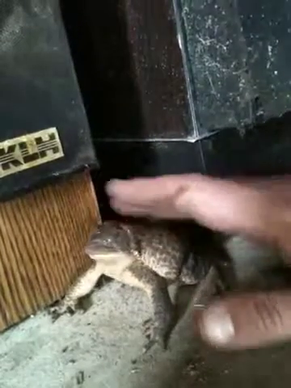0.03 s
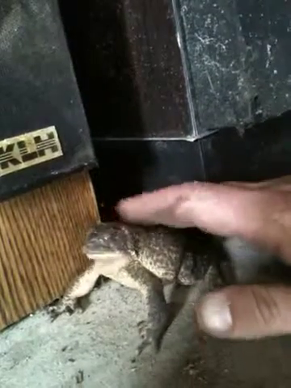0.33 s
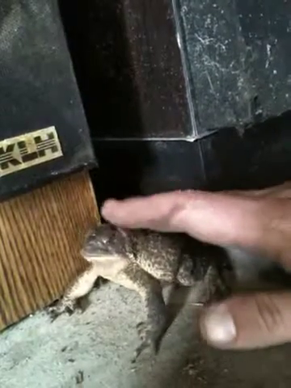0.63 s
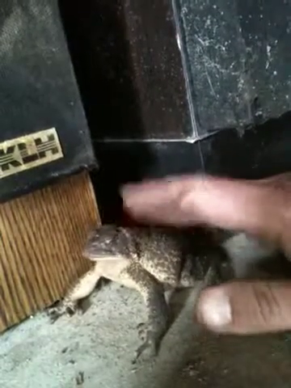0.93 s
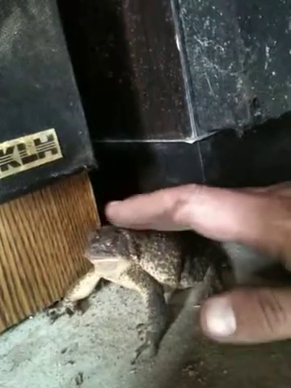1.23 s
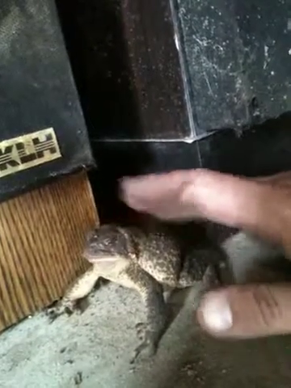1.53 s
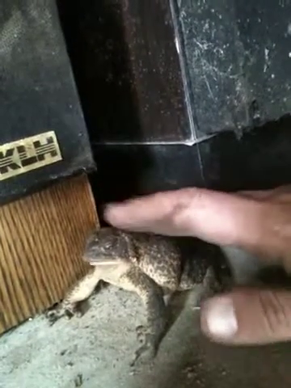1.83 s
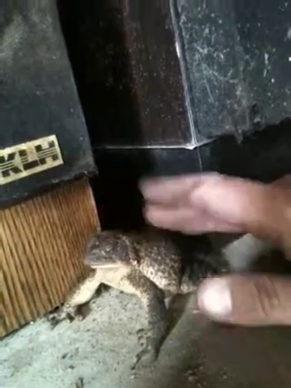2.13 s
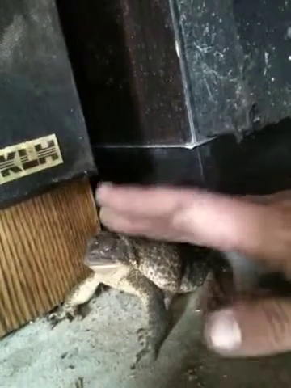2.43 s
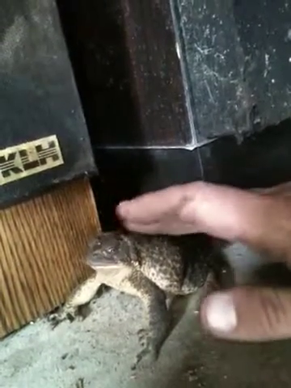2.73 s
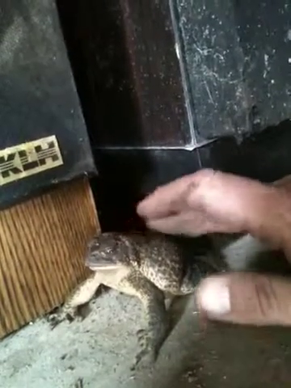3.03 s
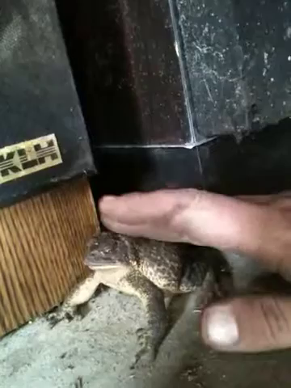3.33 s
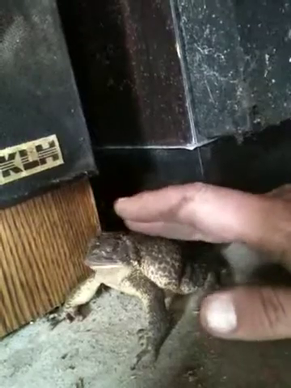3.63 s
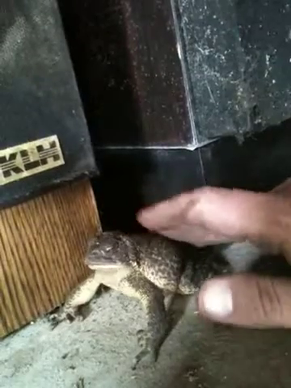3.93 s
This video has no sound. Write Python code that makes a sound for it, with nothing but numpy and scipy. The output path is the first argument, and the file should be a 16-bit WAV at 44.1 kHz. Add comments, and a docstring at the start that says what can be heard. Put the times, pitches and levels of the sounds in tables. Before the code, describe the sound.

A toad close by gives about ten tiny, squeaky chirps in the first second, with soft hand rubs and a faint click near 0.6 seconds. It falls quiet, and two fainter rubs pass by 1.5 seconds. Distant birds whistle, barely audible, from 2.5 to 3.3 seconds. Around 3.7 seconds another rub draws a short run of chirps. An appliance hums low and steady in the room throughout.

```python
"""A toad on an indoor floor answers a stroking hand with tiny release chirps, over an appliance's steady hum.
Each chirp is one squeeze of air: a clear tone that arches and drops, with a thin sheen of high
overtones, thrown back by nearby surfaces. Soft rubs and one faint click fall among the first chirps.
The toad goes quiet, two more rubs pass, and distant birds whistle in the lull.
Near the end, one last rub draws a short run of chirps."""
import sys
import numpy as np
from scipy import signal
from scipy.fft import rfft, irfft
from scipy.io import wavfile

SR = 44100
rng = np.random.default_rng(int(sys.argv[2]) if len(sys.argv) > 2 else 0)


def store_pcm(level_fs):
    """Save levels as 16-bit WAV."""
    pcm = np.round(np.clip(level_fs, -1, 1) * 32767).astype(np.int16)
    wavfile.write(sys.argv[1], SR, np.atleast_2d(pcm).T)


N = 176400
TIME = np.arange(N) / SR


def from_db(db):
    """Decibels to gain."""
    return 10 ** (np.asarray(db) / 20)


def gain_at(curve, hz):
    """Read the gain off an EQ curve of (Hz, dB) points on a log-frequency axis."""
    known_hz, db = np.transpose(curve)
    return from_db(np.interp(np.log(hz + 1e-9), np.log(known_hz), db))


def noise(colour):
    """Noise at unit rms, shaped by a function from frequency to gain."""
    hz = np.arange(N // 2 + 1) * SR / N
    shaped = irfft(rfft(rng.standard_normal(N)) * colour(hz), N)
    return shaped / np.sqrt(np.mean(shaped ** 2) + 1e-20)


def drift(rate_hz):
    """Random modulation at unit rms, moving mostly below the given rate."""
    return noise(lambda hz: 1 / (1 + (hz / rate_hz) ** 2))


def appliance():
    """The bed: broad air noise, narrow droning resonances and a thin, wavering motor whine."""
    # Colour of the room's air noise. Each row: frequency in Hz, relative level in dB.
    air_colour = [(20, -25), (60, -12), (95, -9.5), (120, 1), (205, 1.5), (270, -2), (380, -3), (490, 0),
                  (650, -4.5), (1030, -5), (1350, 1), (1900, -5), (2200, -8.5), (3200, -11), (4500, -17.5),
                  (6000, -20), (8200, -16), (10000, -21.5), (14500, -26.5), (16000, -33)]
    # Humming resonances. Each row: centre in Hz, width in Hz, level in dB.
    drones = [(117.3, 12, -77), (140, 8.6, -71), (202.5, 22, -71), (235.2, 2.6, -73), (309, 40, -77),
              (484, 22, -78), (802, 77, -66.5), (838, 9.6, -71.5), (15300, 210, -92)]
    # Partials of the motor whine. Each row: frequency in Hz, level in dB.
    whine = [(433, -78.5), (1824.6, -67.5), (1884, -76), (1943, -75), (14971, -88), (15030, -82)]
    air_db, waver_db, wander_hz = -59, 1.8, 1.16
    out = from_db(air_db) * noise(lambda hz: gain_at(air_colour, hz))
    for centre, width, db in drones:
        out += from_db(db) * noise(lambda hz: 1 / (1 + (2 * (hz - centre) / width) ** 2))
    for hz, db in whine:
        phase = 2 * np.pi * np.cumsum(hz + wander_hz * drift(rate_hz=2.42)) / SR
        out += np.sqrt(2) * from_db(db + waver_db * drift(rate_hz=8.1)) * np.sin(phase)
    return out


def hiss():
    """Thin bands of high hiss, each swelling and fading on its own."""
    centres_hz, width_hz = (6040, 7600, 8180), 170
    level_db, swell_db = -86.5, 5.5
    bands = [noise(lambda hz: np.exp(-((hz - centre) / width_hz) ** 2)) for centre in centres_hz]
    return sum(band * from_db(level_db + swell_db * drift(rate_hz=7)) for band in bands)


def birds():
    """Distant birds outside: gliding, warbling whistles barely above the hum."""
    # Each row: start in seconds, length in seconds, first and last pitch in Hz, level in dB.
    whistles = [(2.475, 0.046, 2700, 2600, -64.5), (2.73, .11, 2520, 2220, -64),
                (2.83, 0.071, 3500, 3450, -67), (2.88, .035, 3580, 3780, -67),
                (3.12, 0.084, 2660, 2400, -61.5), (3.26, 0.054, 2240, 2180, -63)]
    out = np.zeros(N)
    warble = 1 + 0.017 * drift(rate_hz=89)
    for start, length, first, last, db in whistles:
        span = (TIME >= start) & (TIME < start + length)
        along = (TIME[span] - start) / length
        pitch = (first + (last - first) * along) * warble[span]
        out[span] += from_db(db) * np.sin(np.pi * along) * np.sin(2 * np.pi * np.cumsum(pitch) / SR)
    return out


def room_tail(sound):
    """A short, dull reverb from the floor and furniture."""
    t60_s, send_db, cutoff_hz = 0.11, -16, 4700
    t = TIME[:SR // 2]
    tail = rng.standard_normal(len(t)) * np.exp(-np.log(1000) * t / t60_s)
    wet = signal.fftconvolve(sound, from_db(send_db) * tail / np.linalg.norm(tail))[:N]
    return signal.sosfilt(signal.butter(2, cutoff_hz, fs=SR, output="sos"), wet)


def close_reflections(sound):
    """Close surfaces answer within a chirp: as its pitch falls, the tone dips and swells again."""
    delays_s, levels_db = (.00297, .00406), (-13, -12)
    return sound + sum(from_db(db) * np.interp(TIME - delay, TIME, sound, left=0)
                       for delay, db in zip(delays_s, levels_db))


def hand_rubs():
    """The hand brushes skin softly: short swells of bright friction hiss."""
    # Each row: centre in seconds, half-length in seconds, level in dB.
    strokes = [(0.082, 0.041, -59), (0.338, 0.021, -60.5), (0.667, 0.038, -64.5), (1.003, 0.14, -70.5),
               (1.412, 0.06, -67.5), (3.715, 0.018, -66.5)]
    # Colour of the friction. Each row: frequency in Hz, relative level in dB.
    rub_colour = [(1500, -9), (3500, 7.5), (6000, 5.5), (10500, 9.5), (13000, 6), (16000, -9)]
    swell = sum(from_db(db) * np.exp(-((TIME - centre) / half) ** 2) for centre, half, db in strokes)
    return swell * noise(lambda hz: gain_at(rub_colour, hz))


def click():
    """One tiny hard contact that rings for a few milliseconds."""
    # Ringing modes. Each row: frequency in Hz, relative level in dB, seconds to fade by 60 dB.
    modes = [(3370, -2.5, 0.0039), (8400, 1.5, 0.0015), (10100, 0, 0.0022)]
    start_s, level_db = .6316, -37.5
    t = np.maximum(TIME - start_s, 0)
    out = np.zeros(N)
    for hz, db, t60 in modes:
        decay = np.exp(-np.log(1000) * np.minimum(t / t60, 10))
        out += from_db(level_db + db) * decay * np.sin(2 * np.pi * hz * t)
    return out


def toad():
    """Each squeeze of air gives an arching tone and a little rasp; the sheen needs full pressure."""
    # Each row: start in seconds, length in seconds, level in dB, pressure crest as a share of the length,
    # opening, middle and closing pitch in Hz, second and third harmonic in relative dB, sheen trim in dB.
    chirps = [ (0.0185, .026, -35, 0.58, 1022, 1221, 870, -17.5, -29.5, 2),
              (0.187, .0205, -32.5, 0.51, 1125, 1136, 964, -14.5, -23.5, 0),
              (0.2087, .019, -32.4, 0.55, 967, 1197, 925, -15, -22.5, 0),
              (0.3009, 0.022, -37.5, .56, 1230, 1138, 960, -16.5, -23, -4),
              (0.439, 0.027, -32.4, 0.46, 1022, 1079, 920, -11.5, -30, 1),
              (0.4773, 0.0042, -31, 0.58, 2500, 1900, 1500, -28, -35, -15),
              (0.4787, 0.013, -26.5, 0.24, 1376, 1176, 960, -11, -26, 2.5),
              (0.555, 0.0046, -45, .5, 1750, 1570, 1250, -25, -37, -10),
              (0.5579, .0105, -36.5, 0.54, 1190, 1166, 1050, -16, -26, 5.5),
              (.5681, .0187, -31.3, 0.51, 1204, 1197, 865, -15, -33, 1),
              (0.592, 0.0097, -48, 0.51, 1030, 970, 900, -10, -28, -24),
              (0.7176, 0.013, -41, 0.29, 1040, 1000, 990, -6, -30, -3),
              (0.7348, .0217, -28.5, .49, 1207, 1220, 961, -13.5, -34, 4),
              (0.8224, 0.02, -25.6, .33, 1430, 1216, 855, -16, -26.5, 1.5),
              (3.7655, 0.021, -35, 0.45, 1033, 1036, 935, -10.5, -26, 1.5),
              (3.7864, 0.021, -30, 0.49, 1052, 1158, 965, -14, -37, 1.5),
              (3.8137, 0.012, -34, 0.4, 1075, 1178, 980, -15, -31, 4),
              (3.8988, 0.014, -42.5, 0.16, 1280, 1025, 990, -14, -32, -8)]
    # Colour of the air noise in a chirp. Each row: frequency in Hz, relative level in dB.
    rasp_colour = [(750, -12), (1200, 1), (2700, -3), (4500, -11.5), (8500, -18), (12000, -8), (16000, -45)]
    # Harmonics above the third. Each row: frequency in Hz, level in dB against the fundamental.
    throat_colour = [(4100, -33.5), (5200, -37), (6800, -36), (9200, -53)]
    # Their bright top peak. Each row: frequency in Hz, level in dB before the chirp's sheen trim.
    sheen_colour = [(9300, -52), (10500, -22.5), (11600, -20.5), (12700, -18), (13800, -33), (15200, -35)]
    attack_s, release_s = 0.0026, 0.002
    sag_db = 38.5   # pressure lost one whole chirp length from the crest
    shimmer_db, flutter_db, rasp_db = .5, 2.5, -30.5
    jitter = 1 + .006 * drift(rate_hz=300)
    shimmer = shimmer_db * drift(rate_hz=300)
    overtone_flutter = {k: from_db(flutter_db * drift(rate_hz=80)) for k in range(4, 15)}
    rasp = from_db(rasp_db) * noise(lambda hz: gain_at(rasp_colour, hz))
    out = np.zeros(N)
    for start, length, db, crest, opening, middle, closing, second_db, third_db, sheen_db in chirps:
        span = (TIME >= start) & (TIME < start + length)
        t = TIME[span] - start
        along = t / length
        arch = np.polyfit([0, .5, 1], [opening, middle, closing], 2)
        pitch = np.polyval(arch, along) * jitter[span]
        phase = 2 * np.pi * np.cumsum(pitch) / SR
        attack = np.sin(np.pi / 2 * np.minimum(t / attack_s, 1))
        release = np.sin(np.pi / 2 * np.clip((length - t) / release_s, 0, 1))
        pressure = attack * release * from_db(-sag_db * (along - crest) ** 2)
        tone = np.sin(phase) + from_db(second_db) * np.sin(2 * phase)
        tone += from_db(third_db) * np.sin(3 * phase)
        sheen = from_db(sheen_db) * pressure ** .65   # fades faster than the body of the tone
        for k, flutter in overtone_flutter.items():
            hz = k * pitch
            strength = np.maximum(gain_at(throat_colour, hz), sheen * gain_at(sheen_colour, hz))
            tone += flutter[span] * strength * np.sin(k * phase) * (hz < SR / 2)
        out[span] += from_db(db + shimmer[span]) * pressure * (tone + rasp[span])
    return out


def scene():
    """Toad and hand close by, the appliance all around, birds far off."""
    near = close_reflections(toad()) + click() + hand_rubs()
    return (near + room_tail(near) + appliance() + hiss() + birds())[None]


def record(dry):
    """A steep low-pass takes off the very top."""
    cutoff_hz = 15850
    low_pass = signal.firwin(401, cutoff_hz, fs=SR, window="blackman")
    return signal.fftconvolve(dry, low_pass[None], "same")


dry = scene()
out = record(dry)
store_pcm(out)
```